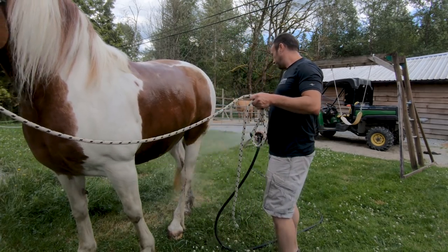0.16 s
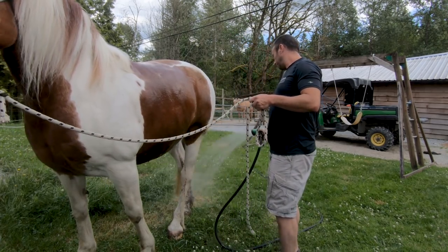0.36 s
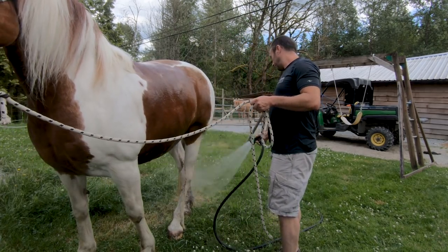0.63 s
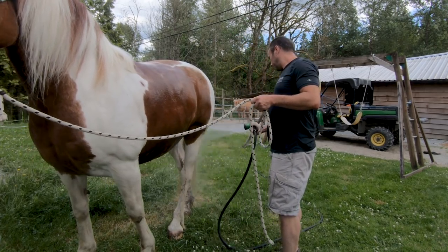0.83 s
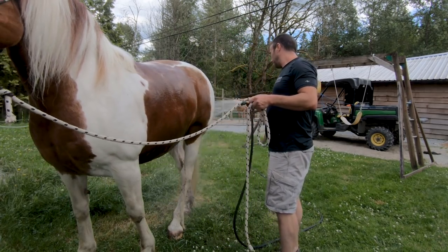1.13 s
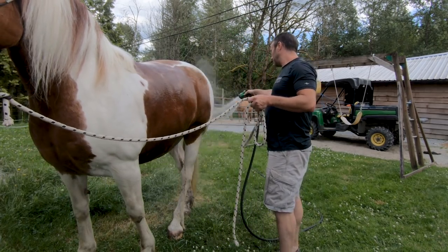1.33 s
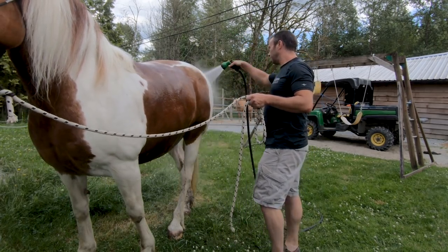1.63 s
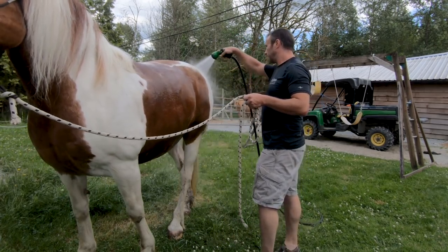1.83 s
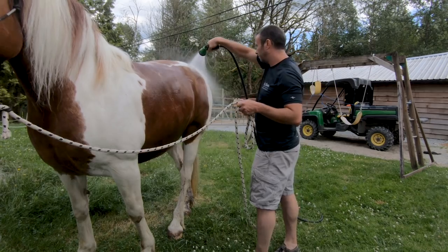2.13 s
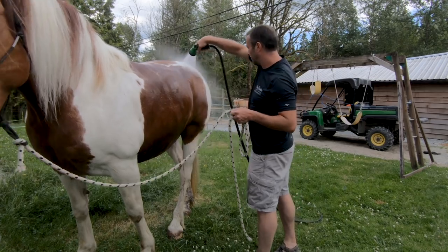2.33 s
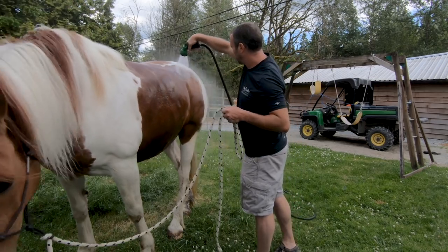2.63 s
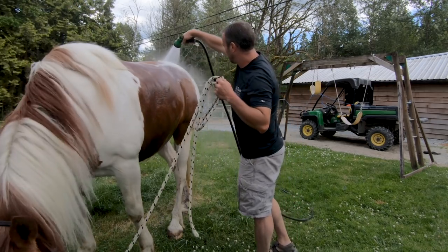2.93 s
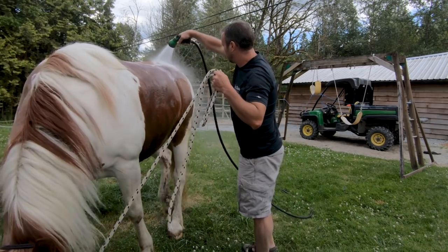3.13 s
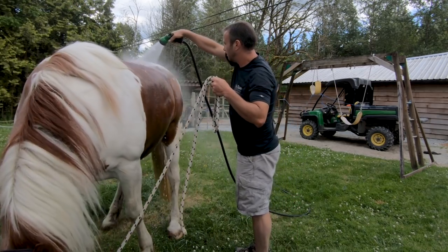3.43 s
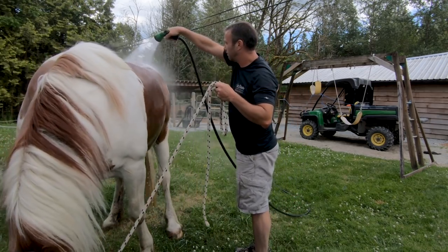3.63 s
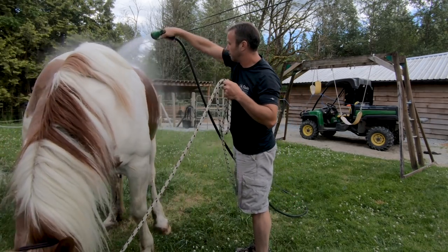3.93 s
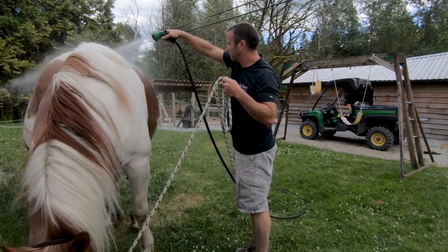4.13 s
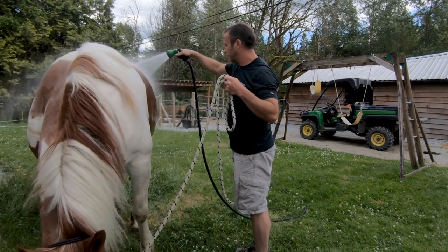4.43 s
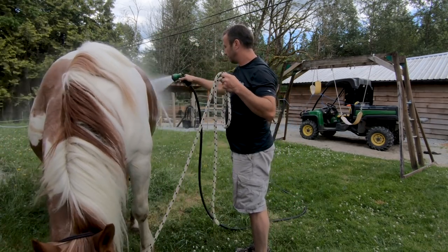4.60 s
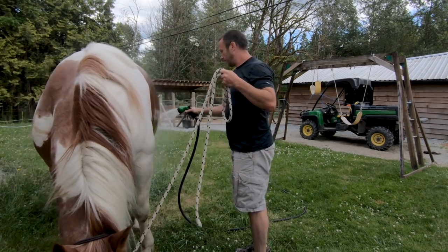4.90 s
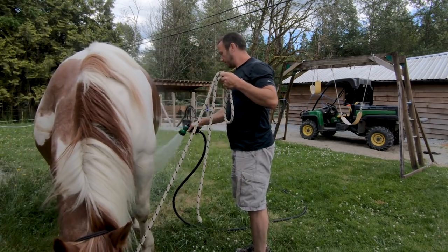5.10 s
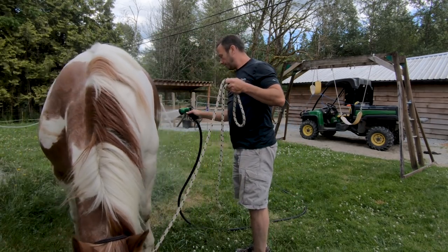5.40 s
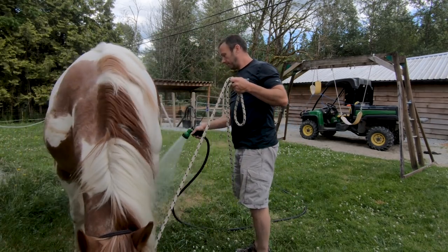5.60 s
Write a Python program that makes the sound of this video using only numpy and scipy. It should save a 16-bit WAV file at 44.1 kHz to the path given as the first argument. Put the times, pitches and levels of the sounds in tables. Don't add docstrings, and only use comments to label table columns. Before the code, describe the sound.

Close stereo camera microphone in open air: fine drops hiss and patter on wet hair, about three or four passes a second, with run-off trickling between. Low wind thumps open the scene, a distant engine pulses and dies down, and thin bird whistles peep briefly. Denser, brighter spray follows, then more wind bumps and short dull knocks, stronger on the right, over a soft distant roar.

```python
import sys
import numpy as np
from scipy import signal
from scipy.io import wavfile
from scipy.ndimage import uniform_filter1d

SR = 44100
rng = np.random.default_rng(int(sys.argv[2]) if len(sys.argv) > 2 else 0)


def generate_wav(signal):
    frames = np.transpose(np.atleast_2d(signal))
    scaled = np.clip(frames, -1, 1) * 32767
    pcm = np.round(scaled).astype(np.int16)
    wavfile.write(sys.argv[1], SR, pcm)


def amp(db):
    return 10 ** (np.asarray(db, float) / 20)


N = 254016
SIZE = 512

# (middle [s], peak level [dB], half length [ms])
THUMPS = [(0.236, -27, 2), (0.247, -33, 3.1), (0.254, -26, 3), (0.264, -22, 3.5), (0.286, -22.5, 2.5),
          (0.296, -45, 6.9), (0.313, -16.5, 3.4), (0.333, -21, 3.1), (0.356, -23, 2.8), (0.369, -21, 1.8),
          (0.381, -31, 5), (0.4, -31, 3.1), (0.418, -24.5, 2.4), (0.43, -28.5, 4.2), (0.458, -31, 2.5),
          (0.47, -31, 3.9), (0.483, -26, 3.6), (0.505, -29, 4.9), (0.511, -32, 5.4), (0.527, -24, 2.6),
          (0.536, -33, 2.7), (0.58, -30, 4.2), (0.588, -29, 6.0), (0.607, -27.5, 4.9), (3.623, -28, 2.2),
          (3.671, -24, 1.7), (3.75, -28, 6.7), (3.772, -34, 7.8), (3.796, -25.5, 3.5), (3.81, -30.0, 2),
          (3.83, -31, 3.5), (3.844, -25, 1.9), (3.855, -30, 1.6), (3.866, -23, 2.7), (3.88, -23.5, 4.8),
          (3.902, -32, 4.9), (3.914, -28, 5.6), (3.931, -27, 5.5), (3.954, -23.5, 3.7), (3.976, -30, 4.6),
          (3.991, -28, 2.8), (4, -29, 5.6), (4.422, -25.5, 3.3), (4.444, -28, 5.2), (4.468, -27.5, 4.6),
          (4.488, -30, 4.7), (4.939, -30, 6.8), (5.308, -21.5, 2.9), (5.32, -35, 2.6), (5.342, -28.5, 2.3),
          (5.44, -27.5, 5.3), (5.453, -28, 2), (5.464, -29, 2.3), (5.476, -28, 3.3), (5.491, -26, 3),
          (5.516, -29, 4.7), (5.538, -21, 4.8), (5.551, -23, 6.1), (5.571, -26, 4.3), (5.586, -25.8, 8)]


def evened(x):
    return x / np.sqrt(np.mean(x ** 2) + 1e-20)


def unit(power):
    return power / power.mean(axis=0)


def read_spectrum(points, hz):
    f, value = np.transpose(points)
    return np.interp(np.log(hz + 1), np.log(f + 1), value)


def read_course(points, t):
    return np.interp(t, *np.transpose(points))


def frames(x, size):
    return signal.stft(x, SR, nperseg=size, noverlap=size * 3 // 4)


def unframe(z, size):
    return signal.istft(z, SR, nperseg=size, noverlap=size * 3 // 4)[1][..., :N]


def whitened(x, size):
    hz, t, z = frames(x, size)
    white = np.mean(abs(frames(rng.standard_normal(SR), size)[2]) ** 2)
    mean_power = uniform_filter1d(np.mean(abs(z) ** 2, axis=1), 5)
    return hz, t, z * np.sqrt(white / (mean_power + 1e-20))[:, None]


def patches(shape, tall, wide):
    field = rng.standard_normal(shape)
    field = uniform_filter1d(field, int(tall), axis=0)
    return evened(uniform_filter1d(field, int(wide), axis=1))


def swell(t, middle, half, db, round_top):
    return amp(2 * db) * np.exp(-abs((t - middle) / half) ** round_top)


def around(power, hz, pitch_hz, octaves):
    distance = np.log2((hz + 1) / pitch_hz) / octaves
    return unit(power * np.exp(-.5 * distance ** 2) + 1e-30)


def ports(common, apart, like, lead, lean_db):
    left, right = amp(lean_db / 2), amp(-lean_db / 2)
    mean = np.sqrt(left ** 2 + right ** 2 + 2 * like * left * right * np.cos(lead)) / 2
    second = like * common + np.sqrt(1 - like ** 2) * apart
    return np.array([left * np.exp(1j * lead) * second, right * common]) / mean


def camera_ports(common, apart, hz):
    # (frequency [Hz], left-right likeness [0-1], phase by which the left leads [rad], left minus right [dB])
    port_table = [(300, .6, .6, -6), (600, .85, 2.2, -7), (1200, .86, 1.5, 0), (2100, .92, 1.1, 1.6),
                  (3500, .98, .6, -.9), (4600, .96, .3, -5), (5200, .79, .4, -7.5), (6200, .86, .6, -10.3),
                  (7200, .68, 1.7, -14.7), (7900, .68, 2.1, -4.9), (9500, .58, 1.4, -1.4),
                  (11300, .55, 2.3, -2.8), (12100, .65, .2, -1.1), (14000, .1, 0, -13), (15300, 0, 0, -26)]
    f, *columns = np.transpose(port_table)
    like, lead, lean_db = (read_spectrum(np.transpose([f, column]), hz)[:, None] for column in columns)
    return ports(common, apart, like, lead, lean_db)


def drops(per_s, spread_db, cycles, count):
    out = np.zeros(N)
    for hz in np.geomspace(900, 16000, count):
        t = np.arange(int(3 * cycles / hz * SR)) / SR
        rising_phase = 2 * np.pi * hz * t * (1 + 0.0356 * t * hz)
        ping = t * np.exp(-3 * t * hz / cycles) * np.sin(rising_phase)
        chance = per_s * hz / 5000 / count / SR
        hits = (rng.random(N) < chance) * amp(spread_db * np.minimum(rng.exponential(1, N), 4))
        train = evened(hits * rng.choice([-1, 1], N))
        out += signal.oaconvolve(train, ping / np.linalg.norm(ping))[:N] * np.sqrt(hz)
    return out


def spray():
    size_edges_hz = [1770, 5920, 7090]
    # (frequency [Hz], density [dB per Hz])
    spatter = [(530, -39), (900, -21.5), (1210, -12.5), (1590, -2), (2120, -2), (2480, 0.5), (3380, 1),
               (5060, -2.5), (6200, 0.5), (7070, -1), (8250, -15), (9750, -16.5), (11000, -20.5),
               (11500, -28), (12100, -23), (14600, -27.5), (15500, -35)]
    # (middle [s], half length [s], level [dB])
    fan = [(0.12, 0.148, -46), (0.168, 0.046, -44.5), (0.4, 0.14, -42.5), (0.54, 0.052, -42.5),
           (0.648, 0.039, -42.5), (0.745, 0.047, -31.5), (0.878, 0.042, -33), (1.181, 0.11, -36),
           (1.278, 0.053, -37.7), (1.652, 0.071, -36.5), (1.81, 0.019, -46), (1.976, 0.07, -36),
           (2.193, 0.016, -43), (2.35, 0.06, -31.5), (2.654, 0.076, -30.5), (2.947, 0.059, -31),
           (3.207, 0.052, -34), (3.412, 0.024, -35.5), (3.54, 0.078, -35.5), (3.782, 0.1, -41.5),
           (3.96, 0.04, -44.5), (4.102, 0.045, -44.5), (4.283, 0.096, -43.5), (4.576, 0.11, -34.5),
           (4.721, 0.014, -42), (5.027, 0.093, -35), (5.26, 0.06, -37.5), (5.437, 0.064, -36),
           (5.645, 0.061, -40.5), (5.745, 0.022, -34)]
    # (middle [s], half length [s], level [dB], pitch of its drops [Hz], glide [octaves per half length])
    core = [(0.213, 0.14, -42.5, 2150, -1), (0.52, 0.096, -41, 2610, 0), (0.675, 0.043, -39, 1370, 0.2),
            (0.785, 0.031, -33.5, 1290, 0.5), (0.907, 0.066, -37.5, 4430, 1),
            (1.102, 0.12, -38.5, 1560, 1.9), (1.328, 0.082, -39, 4200, -0.11), (1.629, 0.1, -43.5, 2150, 3),
            (1.678, 0.13, -36, 2130, -1.1), (1.964, 0.074, -33.5, 2120, -1.1),
            (2.154, 0.083, -40, 1250, 0.7), (2.299, 0.037, -26.5, 7910, -0.5),
            (2.373, 0.049, -32, 1480, 0.3), (2.615, 0.083, -30, 3040, -0.25),
            (2.924, 0.064, -30, 2400, 0.2), (3.19, 0.061, -31.5, 2050, 0), (3.454, 0.075, -32, 2740, -0.5),
            (3.761, 0.11, -35, 1380, -0.3), (4.06, 0.061, -37.5, 1850, 1.5),
            (4.124, 0.038, -35.5, 2680, -0.7), (4.24, 0.077, -39.5, 1880, 0),
            (4.575, 0.15, -32, 5970, 1.05), (4.972, 0.13, -36.5, 7460, 0.4),
            (5.354, 0.22, -41.5, 3500, 1.6), (5.768, 0.034, -31, 5700, -0.01)]
    # (time [s], run-off level [dB], mist relative to the drops [dB])
    near = [(0.0, -51, -25), (0.6, -65, -38), (1.201, -85, -15), (1.45, -59, -27), (1.748, -45.5, -4),
            (2.2, -42, -5), (2.8, -41.5, -6.5), (3.3, -42.5, -5), (3.599, -46, -6), (3.75, -51, -13),
            (3.9, -69, -1.5), (4.1, -46, -16), (4.3, -46.5, -4.5), (4.5, -48.5, -10), (4.75, -51.5, -8.5),
            (5.0, -52, -18), (5.4, -49, -14), (5.76, -53, -21)]
    # (start [s], end [s], level change [dB])
    misses = [(0.094, 0.165, -3.5), (0.284, 0.454, -5), (0.649, 0.791, -9), (0.963, 1.084, -3.5),
              (1.136, 1.255, -5.5), (1.339, 1.519, -9), (2.077, 2.266, 1), (2.423, 2.51, 2.5),
              (2.8, 2.84, -6), (2.984, 3.14, -1.5), (3.247, 3.345, -0.5), (3.603, 3.626, -3.5),
              (3.92, 3.985, -2.5), (4.759, 4.941, -6.5), (5.087, 5.33, -6), (5.487, 5.71, -4)]
    # (middle [s], half length
    # [s], lift [dB], pitch [Hz], glide [Hz/s])
    streaks = [(.19, .04, 7, 5870, 0), (.52, 0.043, 8.5, 5840, 0), (0.934, 0.013, 8, 3700, 0),
               (1.32, 0.024, 9.5, 3300, 0), (1.66, 0.077, 4, 5800, 0), (1.955, 0.022, 6, 3520, 0),
               (2.03, .04, 4, 1600, 0), (2.295, .02, 3, 4560, 0), (2.33, 0.025, 8, 2680, 0),
               (2.55, .03, 7, 2600, 0), (2.64, .015, 7, 3750, -1), (2.672, 0.028, 6, 7050, 0),
               (2.91, 0.036, 5.5, 6900, 0), (2.912, .015, 8, 4750, 0), (3.204, 0.028, 4, 5800, 0),
               (3.187, .02, -1, 1900, 0), (3.43, 0.042, 4, 2470, 0), (3.513, 0.028, 4.5, 1960, 0),
               (3.5, 0.025, 5.5, 5800, 0), (3.55, 0.054, 2, 6800, 0), (4.1, .04, 1.5, 5800, 0),
               (4.13, 0.045, 3, 2860, 3), (4.27, 0.03, 4, 2700, 0), (4.532, 0.033, 4.5, 3770, 3000),
               (4.554, 0.059, 4.5, 5800, 11000), (4.555, 0.042, 7, 4530, 8000), (4.557, .02, 5, 7100, 0),
               (4.722, 0.021, 7.5, 6760, 4000), (4.997, .06, 7, 3350, -3), (5.0, 0.068, 2.5, 6400, 5000),
               (5.414, 0.04, 9, 3400, 2), (5.397, 0.043, 2, 5670, 0)]
    streak_width_hz, core_octaves = 300, 0.85
    fan_round, core_round = 1.72, 2.05
    edge_s = 0.0061
    drizzle_db, runoff_share = -4.5, 0.24

    hz, t, common = whitened(drops(per_s=40000, spread_db=1.8, cycles=7.0, count=20), SIZE)
    apart = whitened(drops(per_s=40000, spread_db=1.8, cycles=7.0, count=10), SIZE)[2]
    hz_down = hz[:, None]

    texture_db = .5 * patches(common.shape, 13, 20.5) + .5 * patches(common.shape, 79, 3.5)
    texture_db += 2.0 * patches(common.shape, 1, 24)
    for middle, half, db, pitch_hz, glide in streaks:
        off_pitch = (hz_down - pitch_hz - glide * (t - middle)) / streak_width_hz
        texture_db += db * np.exp(-((t - middle) / half) ** 2 - off_pitch ** 2)

    coat = amp(2 * read_spectrum(spatter, hz))[:, None]
    over_fat, over_core, over_fine = (1 / (1 + (edge / (hz_down + 1)) ** 7.8) for edge in size_edges_hz)
    near_s, runoff_db, mist_db = np.transpose(near)
    miss_db = np.zeros(len(t))
    for start, end, db in misses:
        miss_db += db * (np.tanh((t - start) / edge_s) - np.tanh((t - end) / edge_s)) / 2

    runoff = amp(2 * (np.interp(t, near_s, runoff_db) + runoff_share * miss_db))
    fan_passes = sum(swell(t, *row, fan_round) for row in fan)
    fine = amp(2 * drizzle_db) * runoff + amp(2 * miss_db) * fan_passes
    power = unit(coat * (1 - over_fat)) * runoff + unit(coat * (over_core - over_fine)) * fine
    for middle, half, db, pitch_hz, glide in core:
        at = abs(t - middle) < 3 * half
        sliding_hz = pitch_hz * 2 ** (glide * np.clip((t[at] - middle) / half, -1.5, 1.5))
        strike = swell(t, middle, half, db + miss_db, core_round)
        power[:, at] += around(coat * (1 - over_core), hz_down, sliding_hz, core_octaves) * strike[at]
    mist = fine * amp(2 * np.interp(t, near_s, mist_db))
    power += unit(coat * over_fine) * mist

    field = np.sqrt(abs(power)) * amp(texture_db)
    return unframe(camera_ports(common, apart, hz) * field, SIZE)


def wind():
    # (frequency [Hz], density [dB per Hz])
    buffet_spectrum = [(15, -40), (30, -32), (62, -59), (90, 1.5), (156, 7), (298, -13.5), (334, -13),
                       (588, -24.5), (692, -22.5), (957, -24.5), (1200, -17), (1560, -9.5), (2640, -120)]
    # (middle [s], half length [s], level [dB], pitch [Hz])
    gusts = [(0.133, 0.044, -35.5, 69), (0.31, 0.049, -37, 300), (0.37, 0.057, -37.5, 332),
             (0.537, 0.085, -30, 226), (0.764, 0.14, -50, 274), (1.152, 0.24, -42, 247),
             (1.84, 0.079, -43, 255), (2.37, 0.042, -41.5, 206), (2.51, 0.11, -48.5, 337),
             (2.792, 0.079, -47.5, 256), (3.046, 0.052, -43.5, 269), (3.24, 0.16, -49, 274),
             (3.458, 0.01, -46.5, 583), (3.55, 0.04, -41.5, 209), (3.651, 0.022, -29.5, 69),
             (3.653, 0.066, -40.5, 554), (3.743, 0.013, -34, 100), (3.857, 0.072, -36, 444),
             (3.923, 0.061, -24.5, 70), (4.14, 0.51, -44.5, 335), (4.344, 0.0064, -34, 214),
             (4.4, 0.039, -43.5, 574), (4.46, 0.039, -26.5, 152), (4.597, 0.21, -46.5, 340),
             (4.938, 0.033, -43.5, 444), (4.966, 0.061, -38, 148), (5.265, 0.069, -34.5, 430),
             (5.315, 0.032, -38, 102), (5.43, .06, -44, 110), (5.17, 0.026, -45, 200), (5.1, .04, -46, 190),
             (5.467, 0.044, -35.5, 377), (5.531, 0.065, -28, 75)]
    # (time [s], level [dB])
    breeze_course = [(0, -39.5), (.45, -40), (.68, -37), (1, -40.5), (1.6, -45.5), (2, -42), (3, -49.5),
                     (3.5, -48), (4.05, -44), (4.3, -52), (4.55, -48), (4.75, -68), (4.88, -54),
                     (5.05, -41.5), (5.18, -48), (5.4, -39), (5.76, -48.5)]
    breeze_hz, breeze_octaves = 175, 2.1
    gust_octaves, gust_round = 0.52, 2.3
    breeze_lean_db, gust_lean_db = -3, -9.5
    hush_db, hush_s, hush_hz, hush_octaves = -13, .022, 185, .8

    hz, t, (common, apart) = frames(rng.standard_normal((2, N + 1024)), 1024)
    hz_down = hz[:, None]
    buffet = amp(2 * read_spectrum(buffet_spectrum, hz))[:, None]
    breeze = amp(2 * read_course(breeze_course, t))
    bursts = sum(around(buffet, hz_down, pitch_hz, gust_octaves) * swell(t, middle, half, db, gust_round)
                 for middle, half, db, pitch_hz in gusts)
    burst_power = bursts.mean(axis=0)
    gusty = burst_power / (burst_power + breeze)
    field = np.sqrt(around(buffet, hz_down, breeze_hz, breeze_octaves) * breeze + bursts)

    thumping = np.minimum(sum(np.exp(-((t - s) / hush_s) ** 2) for s, *_ in THUMPS), 1)
    hush_band = np.exp(-(np.log2((hz_down + 1) / hush_hz) / hush_octaves) ** 4)
    field *= amp(hush_db * thumping * hush_band)
    field *= amp(1.2 * patches(field.shape, 2.2, 2.5))
    lean_db = breeze_lean_db + (gust_lean_db - breeze_lean_db) * gusty
    return unframe(ports(common, apart, 0.5, 0.23, lean_db) * field, 1024)


def thumps():
    out, t = np.zeros((2, N)), np.arange(-1500, 1500) / SR
    for (s, db, half_ms), (turn, slip) in zip(THUMPS, rng.random((len(THUMPS), 2))):
        hz = 165.4 * (4 / half_ms) ** 0.23
        start = round(s * SR) - 1500
        turns = hz * t + turn + np.array([[0.55 * (slip - .5)], [0]])
        push = amp(db) * np.exp(-.5 * (t * 1000 / half_ms) ** 2)
        out[:, start:start + len(t)] += push * np.cos(2 * np.pi * turns)
    return out * amp(np.array([[-7.0], [4.0]]))


def knocks():
    # (time [s], peak level [dB], pitch [Hz], 60 dB decay time [s])
    short_rings = [(3.756, -33, 697, 0.055), (3.827, -26.5, 870, 0.032), (3.827, -29, 513, .03),
                   (3.886, -30, 510, .03), (4.85, -41, 298, 0.028), (5.3, -22, 616, 0.025),
                   (3.451, -39, 1300, .02), (3.602, -37, 670, 0.022), (3.621, -28, 633, 0.024),
                   (3.745, -26, 158, 0.18), (3.829, -25, 280, .06), (3.874, -33, 404, .03), (4.37, -38, 425, .03),
                   (4.378, -29, 800, .015), (4.587, -33, 199, 0.072), (4.703, -35, 700, 0.033),
                   (4.775, -39, 170, .06), (4.85, -31, 900, 0.015), (4.85, -42.5, 1430, 0.013),
                   (4.852, -30.5, 161, 0.11), (4.893, -26, 705, 0.017), (4.893, -36.5, 1010, .012),
                   (4.924, -33, 160, 0.34), (4.963, -34, 151, 0.25), (5.045, -31, 120, .06),
                   (5.158, -34, 170, .08), (5.213, -31, 474, .03), (5.245, -30, 337, 0.056),
                   (5.287, -30, 470, 0.031), (5.287, -27, 1350, 0.015), (5.334, -29, 576, .025),
                   (5.366, -31, 764, 0.023), (5.435, -37, 445, .03), (3.668, -30, 150, .05), (3.86, -28, 110, .12),
                   (3.963, -22.5, 105, 0.13), (5.34, -33, 200, .04), (5.535, -27, 150, .1), (.262, -25, 197, .12),
                   (.68, -38, 186, 0.1), (5.224, -35, 300, .05), (5.262, -34, 423, 0.037)]
    # (frequency [Hz], phase by which the left port leads [rad])
    ring_lead = [(160, 0.76), (600, 1.75), (1400, 1.2)]
    out, t = np.zeros((2, N)), np.arange(4000) / SR
    onset = np.minimum(t / 0.0019, 1)
    for s, db, hz, t60 in short_rings:
        start = round(s * SR)
        lead = np.array([[read_spectrum(ring_lead, hz)], [0]])
        ring = np.sin(2 * np.pi * hz * t + lead)
        out[:, start:start + len(t)] += amp(db - 60 * t / t60) * ring * onset
    return out * amp(np.array([[-2.0], [4.0]]))


def engine():
    # (time [s], common level to which each order adds its own [dB])
    throb_course = [(0, -39.5), (.3, -38), (.55, -48.5), (.7, -56), (.85, -40.5), (1.5, -41.5), (1.75, -48),
                    (2, -41), (2.3, -44), (2.6, -50.5), (2.8, -44.5), (3, -55.5), (3.3, -59.5), (3.8, -52),
                    (4.6, -64.5)]
    # (multiple of the firing cycle [-], level [dB])
    orders_db = [(5, -16), (7, -34), (8, 4.5), (9, 1), (10, -44), (11, -36), (12, -20), (14, -4.5),
                 (15, -13), (16, -15), (17, -19.5), (18, -6.5), (22, -28)]
    # (time [s], firing cycles per second [Hz])
    speed = [(0, 11.635), (1, 11.588), (2, 11.525), (3, 11.444), (4, 11.35)]
    # (time [s], level [dB])
    hum_course = [(0, -54), (2.3, -45), (3.2, -74), (4.5, -75)]
    dulling_db = 0.5
    t = np.arange(N) / SR
    turns = np.cumsum(read_course(speed, t)) / SR + .351
    strongest = orders_db[2][0]
    orders = np.zeros(N)
    for k, db in orders_db:
        level_db = db - dulling_db * t * max(k - strongest, 0)
        orders += amp(level_db) * np.cos(2 * np.pi * k * turns)
    throb = amp(read_course(throb_course, t)) * orders
    hum = amp(read_course(hum_course, t)) * np.sin(2 * np.pi * 120 * t)
    return np.sqrt(2) * (throb + hum) * amp(np.array([[-3.8], [2.8]]))


def bird():
    # (time [s], pitch [Hz], level [dB])
    chirps = [
        [(1.397, 3900, -56), (1.418, 4550, -54), (1.438, 4250, -54.5), (1.457, 3650, -54), (1.482, 3150, -53.5)],
        [(1.43, 4450, -61), (1.452, 4650, -55), (1.472, 4680, -56), (1.487, 4200, -54), (1.508, 3300, -54)],
        [(.316, 4000, -52), (.342, 4080, -54)],
        [(.402, 3950, -55), (.416, 4000, -55)],
        [(.436, 4600, -56), (.452, 4650, -56)],
        [(.468, 2800, -42), (.488, 2800, -43)],
        [(.172, 2450, -47), (.19, 2450, -47)],
    ]
    out = np.zeros(N)
    for chirp in chirps:
        s, hz, level_db = np.transpose(chirp)
        t = np.arange(s[0], s[-1], 1 / SR)
        rough = 1 + 0.45 * evened(uniform_filter1d(rng.standard_normal(len(t)), 90))
        tone = np.sin(2 * np.pi * np.cumsum(np.interp(t, s, hz)) / SR) * rough
        envelope = np.sqrt(2) * amp(np.interp(t, s, level_db)) * signal.windows.tukey(len(t), .2)
        start = round(s[0] * SR)
        out[start:start + len(t)] += envelope * tone
    echoes = amp(-11) * np.roll(out, 700) + amp(-10) * np.roll(out, 1900)
    return (out + echoes) * amp(np.array([[-1.5], [0.5]]))


def roar():
    # (frequency [Hz], density [dB per Hz])
    roar_spectrum = [(180, -22), (300, -8.5), (520, -7), (570, -7), (710, 3), (1100, -0.5), (1800, -2.5),
                     (2200, -15), (4400, -11.5), (5000, -13.5), (7300, -5.5), (8600, -31), (11500, -36.5),
                     (15500, -40)]
    # (time [s], level [dB])
    roar_swell = [(0, 5.5), (1, 6.5), (1.45, 3.5), (2.5, 3.5), (3.5, 3.5), (4, 1), (4.8, 3), (5.76, 0.5)]
    hz, t, (common, apart) = frames(rng.standard_normal((2, N + SIZE)), SIZE)
    field = amp(read_spectrum(roar_spectrum, hz)[:, None] + 1.23 * patches(common.shape, 5, 30))
    field /= np.sqrt(np.mean(field ** 2))
    field *= amp(read_course(roar_swell, t))
    return amp(-52.5) * unframe(camera_ports(common, apart, hz) * field, SIZE)


def scene():
    water, gusts = spray(), wind()
    airborne = water + roar() + engine() + bird()
    low_cut = signal.butter(3, 72, "high", fs=SR, output="sos")
    return airborne + signal.sosfilt(low_cut, gusts + knocks() + thumps())


def roll_off(x):
    return signal.sosfilt(signal.butter(12, 15760, fs=SR, output="sos"), x)


def record(dry):
    rumble_cut = signal.butter(3, 56, "high", fs=SR, output="sos")
    mix = signal.sosfilt(rumble_cut, dry)
    return roll_off(mix)


dry = scene()
out = record(dry)
generate_wav(out)
```